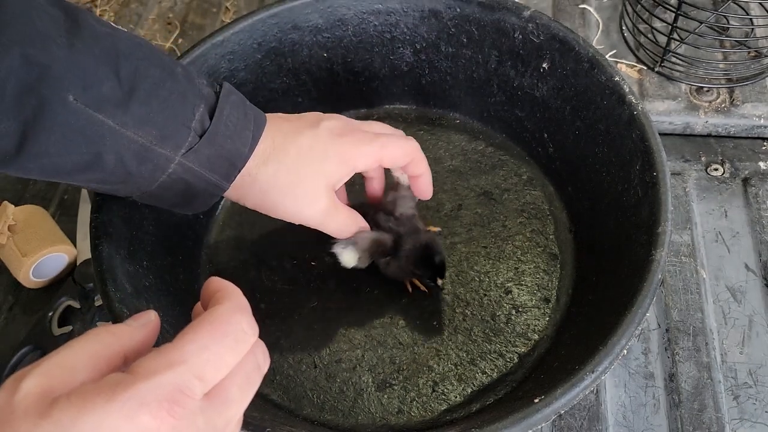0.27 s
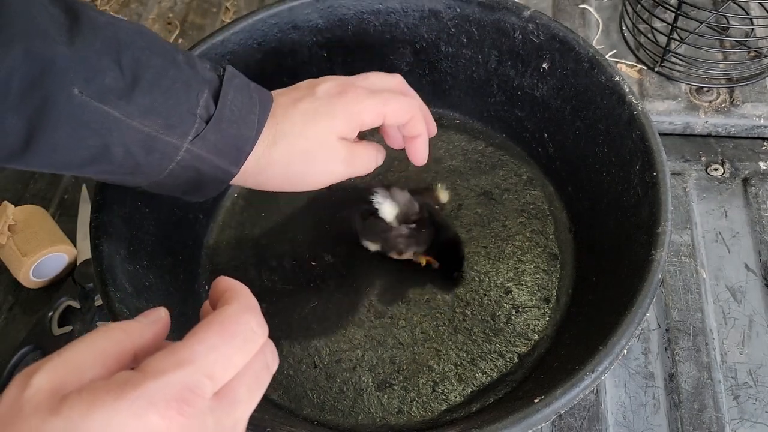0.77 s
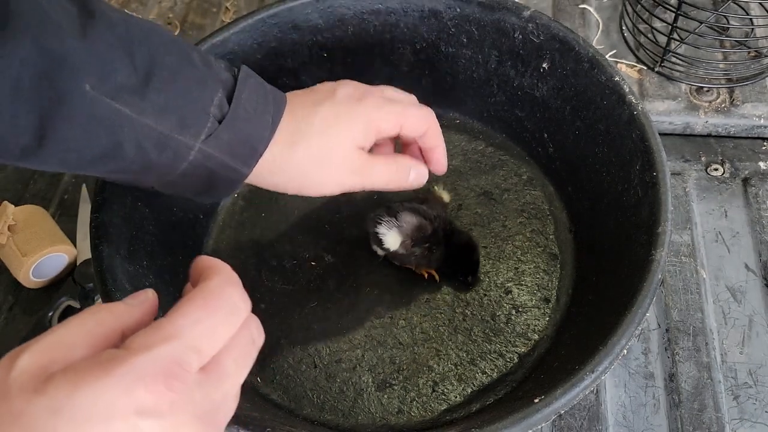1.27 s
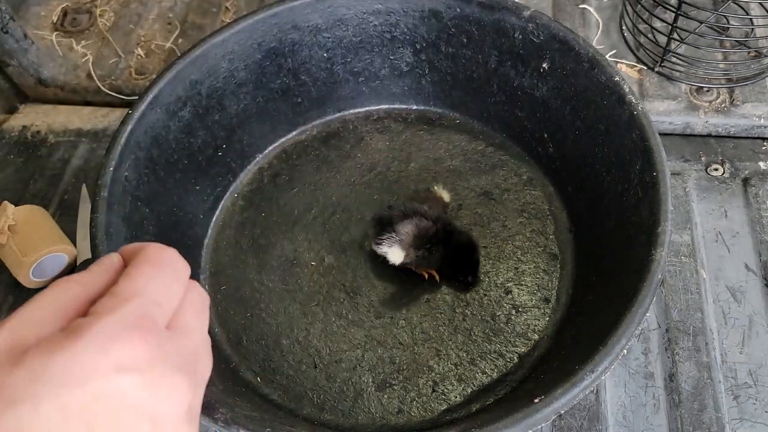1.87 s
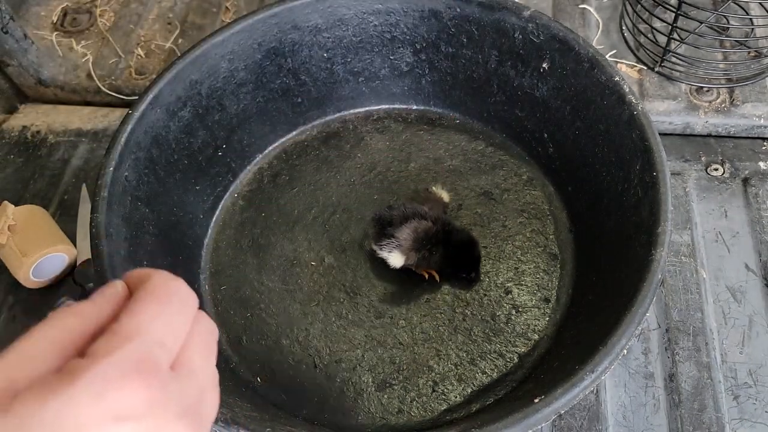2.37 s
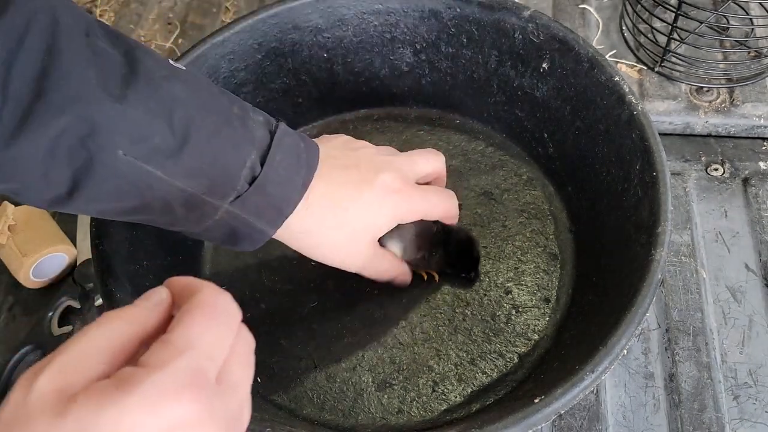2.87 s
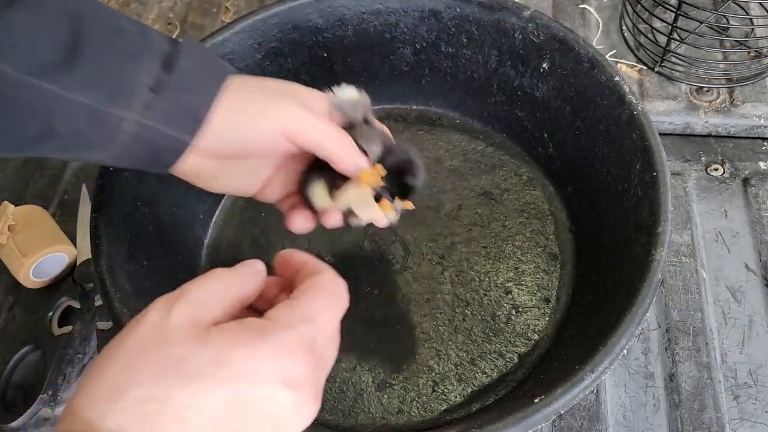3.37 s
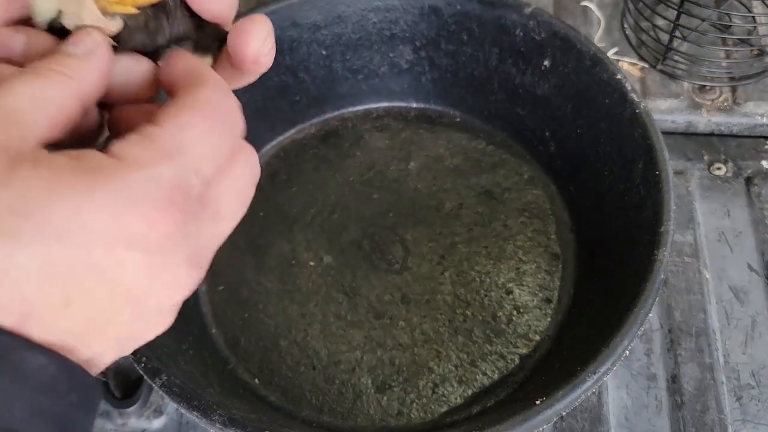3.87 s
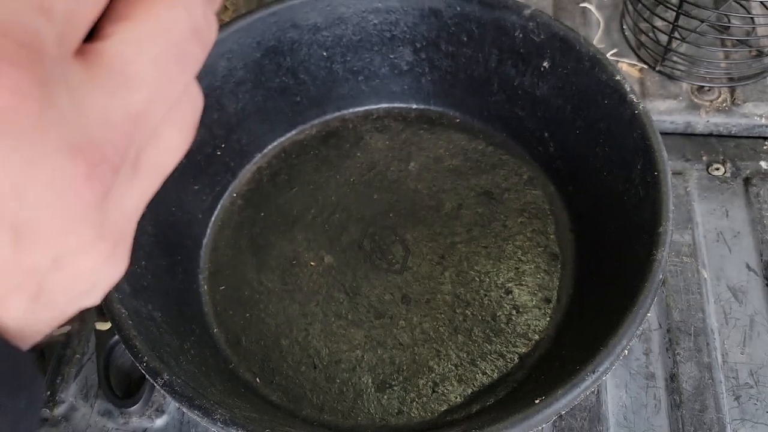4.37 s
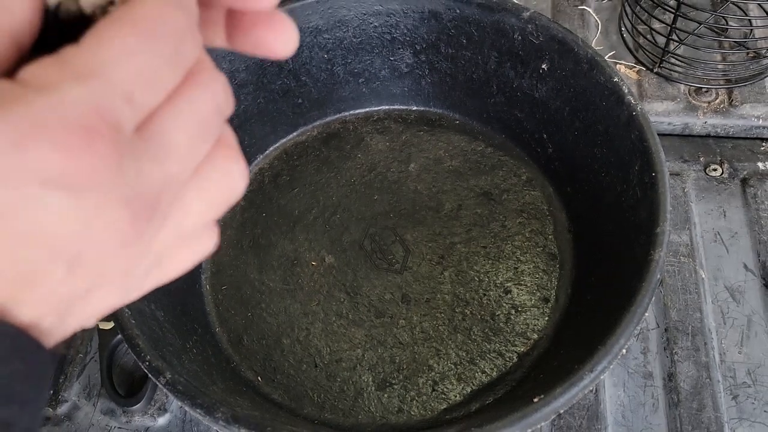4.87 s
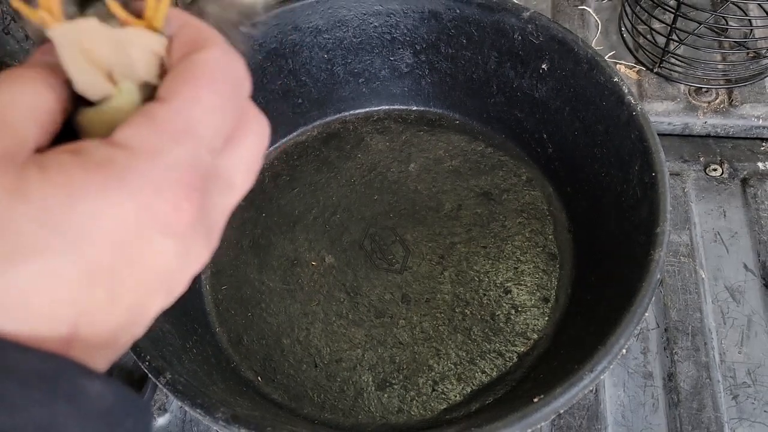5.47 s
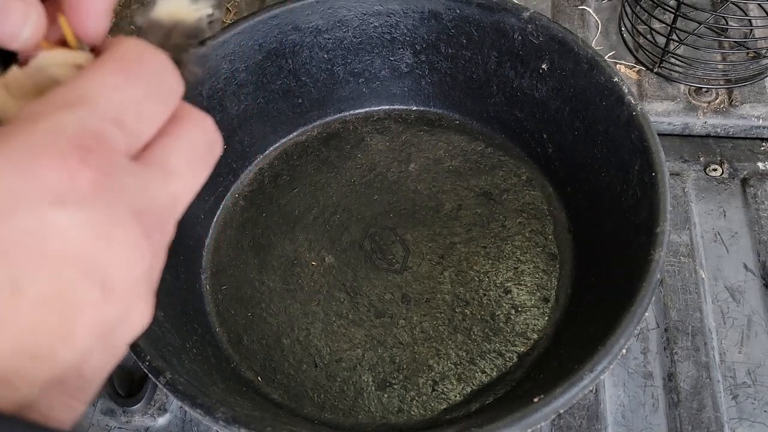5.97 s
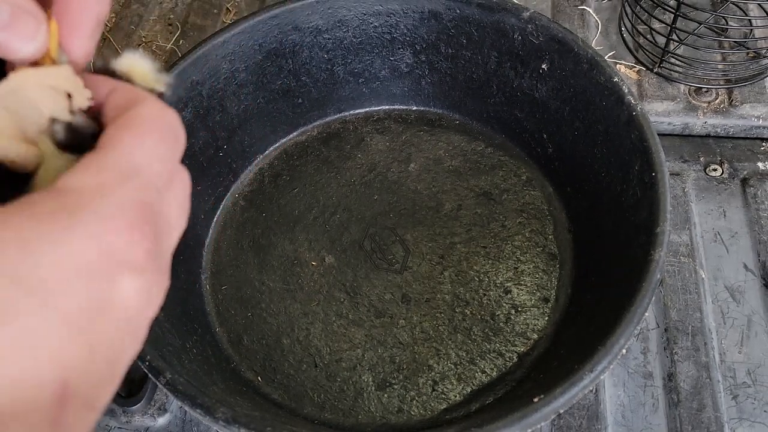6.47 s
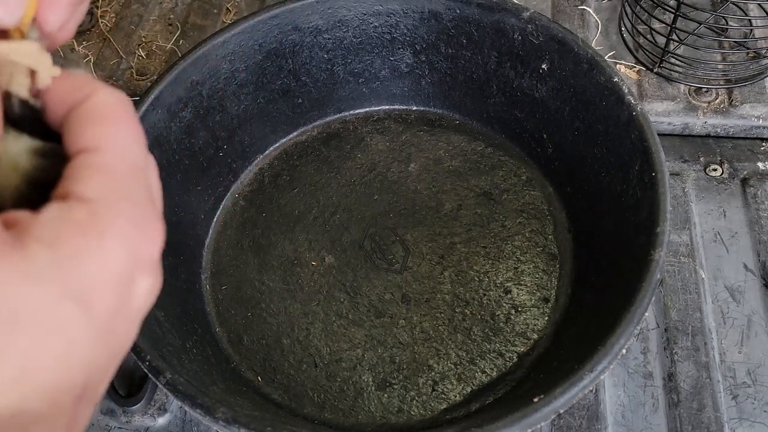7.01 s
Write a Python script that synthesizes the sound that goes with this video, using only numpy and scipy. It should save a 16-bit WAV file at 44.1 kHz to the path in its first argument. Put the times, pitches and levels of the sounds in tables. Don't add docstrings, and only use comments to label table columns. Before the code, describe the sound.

A close stereo microphone in a bare shed, with faint steady hum and airy hiss below. The fading end of a distant chick's peep opens it, with another faint whistle at 0.2. The near chick, in a tub to the left, gives thin, high falling peeps at about 0.3, 0.5, 0.85 and 1.1 seconds, with a short knock at 0.8. From 1.5 to 2.5 the chick is quiet: sleeves rub and swipe, claws and fingers tick in a cluster, low thuds sound. A brighter knock with a low boom falls at 2.9, then a distant whistle at 3.0 and a soft, cracking peep at 3.15. Fluttering peeps come at 3.5, a sharp tick at 3.8. Held in hands, the chick peeps louder, throbbing and hoarse, plunging in pitch, near 4.5, 4.9, 5.2, 5.7, 6.2 and a weaker 6.6. Ticks at 5.2 and 5.7 and hissing cloth swipes accompany them; soft rustle and faint hoarse air end it by 7.2.

```python
import sys
import numpy as np
from scipy import signal
from scipy.fft import rfft, irfft, next_fast_len
from scipy.io import wavfile
from scipy.ndimage import uniform_filter1d, map_coordinates

SR = 44100
rng = np.random.default_rng(int(sys.argv[2]) if len(sys.argv) > 2 else 0)


def ratio_of_db(decibels):
    return 10 ** (np.asarray(decibels, float) / 20)


def persist_wave(psi):
    counts = np.round(np.clip(psi, -1, 1) * 32767).astype(np.int16)
    wavfile.write(sys.argv[1], SR, np.atleast_2d(counts).T)


N = 319284
PORT_LAG_S = 0.00047


def rms_one(x):
    return x / np.sqrt(np.mean(x ** 2) + 1e-20)


def at_hz(points, hz):
    f_hz, level_db = np.transpose(points)
    return np.interp(np.log(hz), np.log(f_hz), level_db, -200, -200)


def drift(rate_hz):
    r = np.exp(-2 * np.pi * rate_hz / SR)
    slow = signal.lfilter([1], [1, -2 * r, r * r], rng.standard_normal(N + SR))
    return rms_one(slow[SR:])


def filtered_noise(count, order, edges_hz, kind):
    sos = signal.butter(order, edges_hz, kind, fs=SR, output="sos")
    return rms_one(signal.sosfilt(sos, rng.standard_normal(count)))


def ports(left, right, lag_s):
    return np.array([left, map_coordinates(right, [np.arange(N) - lag_s * SR], order=3)])


def spans(tables):
    t = np.arange(N) / SR
    gate = np.zeros(N)
    for call in tables:
        inside_s = np.minimum(t - call[0][0] + 0.00154, call[-1][0] + 0.00209 - t)
        gate += np.clip(inside_s / 0.0019, 0, 1)
    rows = np.concatenate(tables)
    rows = rows[np.argsort(rows[:, 0])]
    return [np.minimum(gate, 1)] + [np.interp(t, rows[:, 0], column) for column in rows.T[1:]]


def coloured(spectrum, patchy_db, grit=1):
    # f/Hz, share common to both ports/1
    likeness = [(60, 0.91), (250, 0.68), (600, 0.92), (1500, 0.43), (4000, 0.029), (12000, 0.11)]
    size = next_fast_len(N, True)
    hz = np.maximum(np.fft.rfftfreq(size, 1 / SR), 1)
    f_hz, share = np.transpose(likeness)
    alike = np.clip(np.interp(np.log(hz), np.log(f_hz), share), 0, 1)
    white = rfft(rng.standard_normal((3, N)) * grit, size)
    common, left, right = white * ratio_of_db(at_hz(spectrum, hz)) * np.sqrt(SR / 2)
    late = np.exp(-2j * np.pi * hz * PORT_LAG_S)
    pair = np.sqrt(alike) * common * [late ** 0, late] + np.sqrt(1 - alike) * np.array([left, right])
    out = 0
    for centre_hz in 40 * 2. ** np.arange(0, 9.5, 1.5):
        octaves = np.log2(hz / centre_hz)
        band = np.cos(np.clip(octaves / 1.5, -1, 1) * np.pi / 2) ** 2
        out = out + irfft(pair * band, size)[:, :N] * ratio_of_db(patchy_db * drift(7.8))
    return out


def outdoors():
    # f/Hz, density/(dB per Hz)
    hum = [(12, -108), (33, -91), (65, -82.5), (130, -88), (230, -101), (340, -87.5), (480, -106)]
    # f/Hz, density/(dB per Hz)
    airy = [(1000, -103), (1900, -89.5), (3500, -88.5), (5200, -93), (6800, -104), (8200, -114),
            (12500, -113), (16000, -116)]
    return ratio_of_db(-3.5) * coloured(hum + airy, 0.97)


def shed(x):
    t = np.arange(int(.8 * SR)) / SR
    noise = rng.standard_normal((2, 2, len(t)))
    tub_t60_s, shed_t60_s, walls_ring_hz = 0.1, 0.68, 3780
    tub = noise[0] * ratio_of_db(-37.5 - 60 * t / tub_t60_s) * (t > .002)
    tail = noise[1] * ratio_of_db(-50.0 - 60 * t / shed_t60_s) * np.clip(t / 0.0098, 0, 1)
    echo = signal.lfilter([.6], [1, -.4], tub + tail)
    echo += 0.27 * signal.lfilter(*signal.iirpeak(walls_ring_hz, 2.2, fs=SR), tail)
    return signal.fftconvolve(x[None], echo, axes=1)[:, :N]


def swipes():
    # t/s, level/dB, t60/s
    swipe_events = [(0.729, -59.5, 0.4), (1.168, -53, 0.28), (1.655, -48, 0.69), (1.92, -64, 0.64),
                    (2.155, -55.5, 0.4), (4.401, -61, 2.1), (4.77, -54.5, 1.86), (5.19, -51, 0.75),
                    (3.65, -64, 1.6), (5.599, -45, 0.45), (5.986, -48.5, 0.45), (6.455, -43, 0.49),
                    (7.08, -60, 0.25)]
    t, level = np.arange(N) / SR, np.zeros(N)
    for start_s, level_db, t60_s in swipe_events:
        after_s = t - start_s
        level += np.clip(after_s / 0.012, 0, 1) * ratio_of_db(level_db - 60 * np.maximum(after_s, 0) / t60_s)
    return level


def sleeves():
    # t/s, rub level/dB
    motion = [(0, -58), (.3, -61.5), (.66, -68.5), (.85, -60), (1.0, -72.5), (1.4, -58.5), (1.6, -51),
              (1.73, -45), (1.87, -59), (2.02, -50), (2.13, -60.5), (2.33, -50.5), (2.45, -56.5),
              (3.3, -56.5), (3.8, -52), (4.07, -59.5), (5.7, -59.5), (7.24, -65.5)]
    # f/Hz, level/dB
    rub_spectrum = [(120, -2.5), (300, -7), (600, -4.5), (1000, -1.5), (2000, -5.5), (4000, -7.5),
                    (8000, -55)]
    # f/Hz, level/dB
    hiss_spectrum = [(2000, -20.5), (5000, -9), (7000, -3.5), (8500, -15.5), (11500, -16.5), (13500, -9),
                     (15000, -9.5), (16500, -18)]
    rub_db = np.interp(np.arange(N) / SR, *np.transpose(motion))
    hiss_db = -72 + 0.92 * (rub_db + 60.5)
    grains, swipe = ratio_of_db(2.0 * drift(660)), swipes()
    rub_level = np.hypot(ratio_of_db(rub_db - 2.5), 0.21 * swipe)
    hiss_level = np.hypot(ratio_of_db(hiss_db + 5.0), swipe)
    rubbing = rub_level * rms_one(coloured(rub_spectrum, 3.66, grains)) * ratio_of_db([[1.5], [-1.5]])
    hissing = hiss_level * rms_one(coloured(hiss_spectrum, 0.47, grains)) * ratio_of_db([[1.2], [-1.2]])
    return rubbing + hissing


def blow(hz, t60_s, crack):
    t = np.arange(SR // 2) / SR
    ring = 0
    for ratio, gain, draw in zip((.55, 1.0, 1.6), (.4, 1.0, .2), rng.random(3)):
        ring = ring + gain * np.sin(2 * np.pi * hz * ratio * (0.91 + 0.24 * draw) * t)
    dull = signal.butter(2, [500, 5000], "band", fs=SR, output="sos")
    burst = signal.sosfilt(dull, rng.standard_normal(len(t)) * ratio_of_db(-60 * t / 0.0011))
    swell = 1 - np.exp(-1.5 * t * hz)
    return (ring * swell + crack * burst) * ratio_of_db(3.5 - 60 * t / t60_s)


def place_blows(blows):
    out = np.zeros((2, N + SR))
    for start_s, peak_db, pan_db, sound in blows:
        i = round(start_s * SR)
        out[:, i:i + len(sound)] += sound * ratio_of_db([[peak_db + pan_db / 2], [peak_db - pan_db / 2]])
    out[1] = np.roll(out[1], round(PORT_LAG_S * SR))
    return out[:, :N]


def knocks():
    # t/s, peak/dB, centre f/Hz, t60/s
    knock_events = [
        (.8, -48, 211.6, 0.036),
        (1.642, -52, 85.9, 0.16),
        (1.92, -56, 197, 0.31),
        (2.248, -51, 210, 0.054),
        (2.904, -43.5, 369, 0.068),
        (2.908, -49.5, 146.5, 0.13),
        (2.96, -50.5, 79.2, 0.3),
        (3.849, -49, 232, 0.04),
    ]
    return place_blows([(s, peak_db, 0, blow(hz, t60_s, crack=.03))
                        for s, peak_db, hz, t60_s in knock_events])


def ticks():
    # t/s, peak/dB, centre f/Hz, left minus right/dB
    tick_events = [(1.536, -41.5, 1930, 12), (1.58, -42.5, 596, 7), (1.6415, -35, 683, 8),
                   (1.649, -40, 690, 2), (1.649, -40, 2100, -3), (1.655, -41, 2100, 0),
                   (2.11, -45, 2830, 0), (3.49, -50, 557, 11), (2.73, -49.5, 546, 4), (1.701, -38, 610, 5),
                   (1.71, -44, 516, 14), (1.716, -42, 584, 15), (1.742, -38, 1920, -22),
                   (1.747, -41.5, 2030, 31), (1.79, -39, 1350, -1), (2.325, -46, 585, 12),
                   (2.356, -38, 2060, -9), (2.495, -49.5, 1910, 28), (3.474, -54, 2704, -9),
                   (3.791, -26, 2410, 4), (5.179, -37, 2700, -4), (.748, -52, 1100, 15.5),
                   (5.25, -31.5, 2398, -1), (5.699, -34, 3260, 5), (.5505, -35, 2280, 5),
                   (3.184, -45, 1900, -7), (5.712, -35, 10950, 8)]
    return place_blows([(s, peak_db, pan_db, blow(hz, 17.5 / hz, crack=0.63))
                        for s, peak_db, hz, pan_db in tick_events])


def far_chick():
    # t/s, pitch f/Hz, level/dB
    far_peeps = [
        [(0.0, 3860, -46), (0.05, 3825, -62.5), (0.2, 3850, -72)],
        [(0.204, 4786, -67), (0.226, 4880, -59), (0.252, 5060, -61)],
        [(2.99, 4130, -63), (3.04, 3820, -61), (3.095, 3110, -62)],
    ]
    gate, hz, level_db = spans(far_peeps)
    phase = 2 * np.pi * np.cumsum(hz * (1 + 0.0124 * drift(68.0))) / SR
    return gate * ratio_of_db(level_db + 7.0 * drift(99)) * np.sin(phase)


def hoarse():
    hoarse_spans = [(0.548, 0.557, 5170, 1389, -50), (2.745, 2.93, 4020, 464, -61),
                    (2.99, 3.113, 3800, 900, -54), (3.075, 3.115, 2643, 250, -56),
                    (3.45, 3.536, 6360, 1630, -58), (4.464, 4.553, 6450, 1514, -57),
                    (5.126, 5.145, 5720, 878, -45.5), (5.601, 5.642, 3280, 548, -38.5),
                    (5.611, 5.63, 6370, 829.6, -50), (6.129, 6.199, 3540, 900, -45),
                    (6.134, 6.202, 6790, 682, -48.5), (6.59, 6.627, 5580, 255.3, -51),
                    (3.129, 3.184, 5600, 400, -52), (3.131, 3.171, 2480, 302, -54),
                    (3.198, 3.37, 3870, 160, -63), (6.603, 6.655, 6980, 702, -51),
                    (6.124, 6.187, 12530, 2350, -64), (6.584, 6.664, 11800, 1195, -59.5),
                    (0.524, 0.568, 1510, 1160, -53), (1.169, 1.267, 1226, 968, -57.5),
                    (6.876, 7.032, 4400, 645.8, -55.5), (7.156, 7.242, 5280, 200, -60.5),
                    (0, 0.055, 5290, 200, -58), (.54, 0.55, 5830, 500, -50), (.12, 0.25, 2880, 150, -61),
                    (4.3, 4.397, 4240, 655, -52.5)]
    out = np.zeros(N)
    for start_s, end_s, hz, width_hz, level_db in hoarse_spans:
        i, j = round(start_s * SR), min(round(end_s * SR), N)
        throat = filtered_noise(SR // 4, 2, [hz - width_hz / 2, hz + width_hz / 2], "band")
        out[i:j] += ratio_of_db(level_db) * throat[:j - i] * signal.windows.tukey(j - i, .5)
    return out * ratio_of_db(2.3 * np.clip(drift(150), -3, 1.5))


def throb():
    throb_spans = [(.2625, .2865, 200, 280, .85), (.316, .34, 170, 220, .5), (.521, .535, 140, 110, .5),
                   (.536, .566, 120, 230, .4), (.81, .85, 130, 130, .2), (1.075, 1.1, 200, 200, .2),
                   (3.115, 3.172, 190, 220, .5), (3.455, 3.472, 330, 300, .7),
                   (3.472, 3.506, 210, 240, .75), (3.518, 3.54, 280, 280, .8), (4.471, 4.517, 200, 210, .7),
                   (4.83, 4.878, 150, 170, .4), (5.203, 5.2095, 150, 150, .8),
                   (5.2095, 5.237, 270, 200, .95), (5.61, 5.631, 260, 230, .7),
                   (5.631, 5.666, 200, 110, .85), (5.668, 5.678, 110, 110, .5),
                   (5.678, 5.702, 150, 270, .9), (6.155, 6.2, 200, 150, .5), (6.62, 6.652, 240, 200, .4)]
    t, wander = np.arange(N) / SR, drift(120)
    gain, waver_hz, depths = np.ones(N), np.zeros(N), np.zeros(N)
    for start_s, end_s, rate_a_hz, rate_b_hz, depth in throb_spans:
        now = (t >= start_s) & (t < end_s)
        rate_hz = np.linspace(rate_a_hz, rate_b_hz, now.sum()) * (1 + .12 * wander[now])
        cycles = .5 + np.cumsum(rate_hz) / SR
        pair = np.exp(-1j * np.pi * depth * cycles) * (1 + depth * np.exp(2j * np.pi * cycles))
        depths[now] = depth
        gain[now] = np.abs(pair) / np.sqrt(1 + depth ** 2)
        waver_hz[now] = np.gradient(np.unwrap(np.angle(pair))) * SR / (2 * np.pi)
    return (uniform_filter1d(gain, size=24), uniform_filter1d(waver_hz, size=12),
            uniform_filter1d(depths, size=200))


def unevenness():
    uneven_spans = [(0.529, 0.557, -21, -24), (3.152, 3.17, -30, -14), (3.464, 3.502, -28, -15),
                    (4.418, 4.474, -23, -12), (4.47, 4.52, -27, -28), (4.792, 4.882, -15, -21),
                    (4.887, 4.91, -34, -20), (5.134, 5.153, -8, -28), (5.213, 5.22, -30, -8),
                    (5.634, 5.67, -28, -35)]
    t, level = np.arange(N) / SR, np.full((2, N), ratio_of_db(-66))
    for start_s, end_s, half_db, odd_db in uneven_spans:
        edge = np.clip(np.minimum(t - start_s, end_s - t) / 0.0056, 0, 1)
        level += ratio_of_db([[half_db], [half_db + odd_db]]) * edge
    return level


def cracks():
    # t/s, half width/s, change/dB
    crack_events = [(0.2852, 0.0041, -12), (0.535, 0.0017, -16), (3.176, 0.00092, 8), (3.1795, 0.0022, 5),
                    (3.182, 0.0013, -11), (3.193, 0.0025, -9), (3.506, 0.0011, -14), (4.432, 0.001, 1),
                    (4.471, .001, -5), (4.522, 0.0011, -12), (4.528, 0.0039, 7), (4.799, 0.00094, -14),
                    (5.146, 0.0032, -11), (5.157, .005, 0), (5.2, 0.003, -5), (5.205, 0.0031, 1),
                    (5.2502, 0.00044, -26), (5.607, .004, -10), (5.666, 0.0025, -16), (5.674, 0.0065, 3),
                    (5.708, .0015, 3.5), (5.711, .001, -7), (6.2053, 0.00087, -3), (6.2129, 0.00088, -13),
                    (5.645, .012, 3.5), (5.699, 0.0037, -3), (6.675, 0.00056, -5)]
    t = np.arange(N) / SR
    return ratio_of_db(sum(db * np.exp(-((t - s) / width_s) ** 2) for s, width_s, db in crack_events))


def peep(moments, manner, place, gape_db):
    opens, knee, crest, end = np.array(moments)
    attack_s, above_hz, arch_hz, slide_bow = manner
    held_db, slide_db, lag_ms = place
    u = np.linspace(0, 1, num=9)[:, None]
    settle_db = 4
    rise_db = min(attack_s * 1203, 15)
    start = opens + [-attack_s, above_hz, -rise_db]
    attack = start + u[:-1] ** [1, 1.14, 0.61] * (opens + [0, 0, settle_db] - start)
    held = opens + u * (knee - opens)
    held = held + np.sin(np.pi * u ** 1.2) * [0, arch_hz, 0]
    held = held + np.exp(-u / 0.27) * [0, 0, settle_db]
    slide = knee + u[1:] ** [1, slide_bow, slide_bow] * (crest - knee)
    fade = crest + u[1:] ** [1, 1, 1.28] * (end - crest)
    rows = np.vstack([attack, held, slide, fade])
    pan_db = np.interp(rows[:, 0], [knee[0], crest[0]], [held_db, slide_db])
    return np.column_stack([rows, pan_db, np.full(len(rows), lag_ms), np.full(len(rows), gape_db)])


def chick():
    # t/s, pitch f/Hz, left level/dB
    tub_peeps = [
        [(.26, 5690, -41), (.29, 5200, -29), (.312, 4340, -25.5), (.339, 2980, -43)],
        [(.495, 5430, -48.5), (.528, 4870, -29.5), (.541, 4050, -26), (.546, 3855, -26)],
        [(.548, 3880, -28.5), (.553, 3880, -27), (.558, 3410, -25), (.567, 2700, -37)],
        [(.813, 5470, -46.5), (.86, 5380, -33.5), (.871, 4630, -33), (.881, 3650, -36)],
        [(1.042, 5490, -37.5), (1.074, 5470, -28.5), (1.083, 4520, -26), (1.1, 3234, -27.5)],
        [(3.123, 4850, -43), (3.173, 5030, -40.5), (3.18, 4026, -27.5), (3.194, 3634, -30)],
    ]
    hand_peeps = [
        [(3.457, 5850, -48), (3.464, 5870, -32), (3.467, 5720, -32), (3.47, 5460, -42)],
        [(3.473, 5334, -37.5), (3.503, 5285, -30.5), (3.512, 4620, -20), (3.519, 4770, -28.5)],
        [(3.523, 5100, -33), (3.528, 5380, -34), (3.533, 4980, -48), (3.54, 4500, -60)],
        [(4.432, 5460, -36), (4.514, 5625, -32), (4.528, 3990, -30), (4.535, 4070, -25)],
        [(4.542, 5380, -35), (4.549, 4890, -49), (4.557, 3660, -30.5), (4.562, 3180, -37)],
        [(4.776, 5630, -39.5), (4.786, 5700, -30.5), (4.792, 5500, -26.5), (4.797, 5400, -46)],
        [(4.801, 5380, -40.5), (4.875, 5430, -37.5), (4.899, 3400, -18), (4.913, 2765, -29.5)],
        [(5.16, 5188, -27), (5.234, 5015, -30), (5.247, 3590, -16), (5.259, 2816, -27)],
        [(5.615, 5297, -32), (5.693, 4980, -26.5), (5.71, 3963, -20.5), (5.724, 3737, -25)],
        [(5.727, 3870, -23), (5.731, 3920, -24.5), (5.735, 3450, -21), (5.738, 3060, -35)],
        [(6.126, 6190, -51), (6.138, 6220, -45), (6.147, 5780, -48), (6.153, 5660, -46)],
        [(6.156, 5700, -50), (6.196, 5330, -48), (6.213, 3400, -16.5), (6.221, 2785, -28)],
        [(6.586, 5690, -54), (6.591, 5870, -29), (6.598, 6280, -53), (6.615, 6210, -41)],
        [(6.619, 5700, -53), (6.654, 5600, -41.5), (6.665, 4120, -29.5), (6.685, 2910, -32)],
    ]
    # attack/s, start above note/Hz, arch of held note/Hz, slide bow/1 (under 1 plunges first)
    manners = [(0.011, 60.5, 116.5, 1.07), (.01, 52, 100.5, 1.16), (0.00076, 39, 33, 1.06),
               (0.011, 50.5, 25, 1.082), (0.022, 29.5, 8, 1.064), (.012, -750, 60.5, 0.728),
               (0.0061, -50.5, 29, 1.1), (0.0019, 43, -39.5, 0.555), (0.00099, -100, 20, 0.69),
               (0.027, 448.5, -32, 0.614), (0.00462, -500, 29, 1.035), (.012, -30.5, 19, 0.86),
               (0.0028, 16, 202.5, .65), (0.018, 251.5, 330, 0.487), (0.0057, 57, 169.5, 0.75),
               (0.00075, -48, 24, 2.3), (.006, -200, 27, 1.1), (.002, 20, 14, .5),
               (0.0067, -58.5, 22, 1.13), (0.0024, 200, -59, 0.954)]
    # left minus right held/dB, in slide/dB, lag of right port/ms
    places = [(3.5, 4.6, -0.217), (11, 2.9, -0.553), (14, 7.1, -0.513), (3.5, 4.1, -0.04),
              (2.5, 4.4, 0.254), (7, 13, -0.052), (6, 16, 0.388), (11, 1.6, 0.404), (11, 8, 0.43),
              (5.5, 14, 0.638), (6, 8.2, 0.656), (5.5, 9.4, 0.602), (8.5, 8.6, 0.591), (6, 0.9, 0.589),
              (5.5, 26, 0.632), (6, 19, 0.68), (11, 6.5, 0.463), (11, 10, 0.425), (2, 7.7, 0.417),
              (12, 14, 0.416)]
    gapes = [-1.5, 0.5, 6.5, -1.5, -5, -8, -1., 2, -4., -8, -6., -5., 1.5, -1.5, -0.5, -20, -4, 2.5, 2, -2.]
    # octave f/Hz, level re main/dB
    beak = [(5500, -23), (7000, -18), (8000, -38), (9500, -34.5), (10600, -20.5), (11700, -27),
            (12500, -12)]
    peeps = [peep(*settings) for settings in zip(tub_peeps + hand_peeps, manners, places, gapes)]
    gate, hz, level_db, pan_db, lag_ms, gape_db = spans(peeps)
    beat, waver_hz, depth = throb()
    steady = 2 * np.pi * np.cumsum(hz * (1 + 0.0055 * drift(234))) / SR
    turn = steady + 2 * np.pi * np.cumsum(waver_hz) / SR

    ragged = ratio_of_db(2.2 * drift(300))
    octave, twelfth = (ratio_of_db(at_hz(beak, np.clip(k * hz, 5600, 12400))) for k in (2, 3))
    overtones = octave * np.sin(2 * turn) + ratio_of_db(-21.0) * twelfth * np.sin(3 * turn)
    main = np.sin(turn) + ragged * ratio_of_db(gape_db - 4 * depth) * overtones

    uneven_db = 13.5 + 2.3 * drift(150) - np.clip(5000 - hz, 0, 1000) / 70
    low, odd = unevenness() * ratio_of_db(uneven_db)
    half = low * np.sin(steady / 2)
    half += odd * ragged * (np.sin(3 * steady / 2) + 0.42 * np.sin(5 * steady / 2))

    breath = ratio_of_db(-27.0) * filtered_noise(N, 4, [2500, 7000], "band")
    breath += ratio_of_db(-35) * np.clip((hz - 4600) / 600, 0, 1) * filtered_noise(N, 4, 10000, "high")
    level = gate * ratio_of_db(level_db + 1.5 + 1.0 * drift(230)) * cracks()
    voice = level * (beat * (np.sqrt(2) * main + breath) + np.sqrt(2) * half)
    return voice, pan_db, lag_ms / 1000


def scene():
    voice, pan_db, lag_s = chick()
    voice = voice + hoarse()
    far = far_chick()
    taps = ticks() + knocks()
    near = ports(voice + far, voice * ratio_of_db(-pan_db) + far, lag_s) + taps
    echoes = shed(voice + 3 * far + taps[0])
    return near + echoes + sleeves() + outdoors()


def roll_off(x):
    return signal.sosfilt(signal.butter(12, 15830, fs=SR, output="sos"), x)


def record(dry):
    notch = signal.lfilter(*signal.iirnotch(8250, 9.0, fs=SR), dry)
    top_cut = signal.cheby2(16, 70, 16150, fs=SR, output="sos")
    return roll_off(signal.sosfilt(top_cut, 0.41 * dry + 0.46 * notch))


dry = scene()
out = record(dry)
persist_wave(out)
```